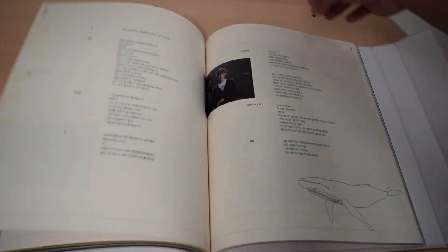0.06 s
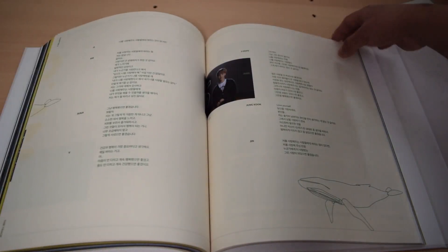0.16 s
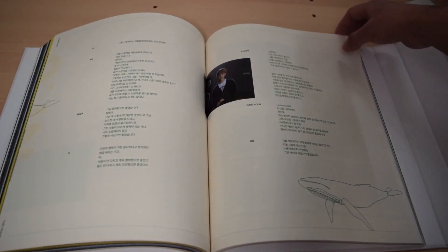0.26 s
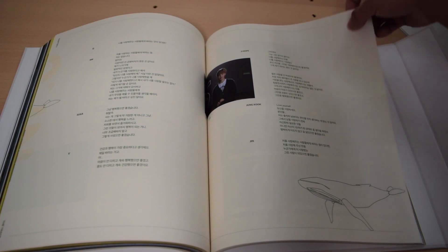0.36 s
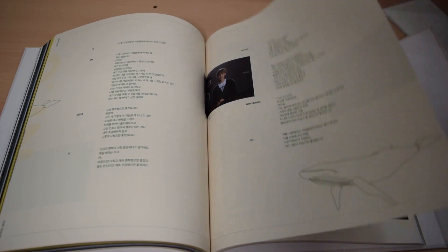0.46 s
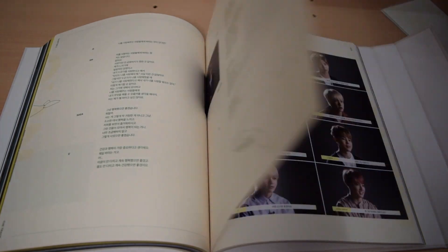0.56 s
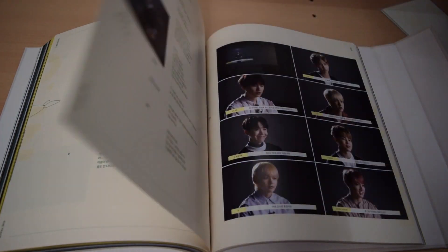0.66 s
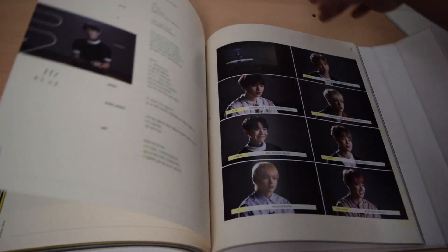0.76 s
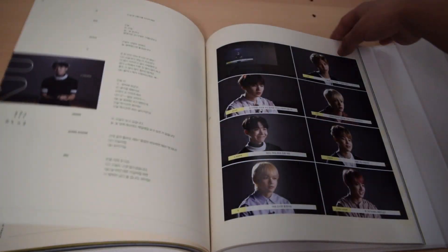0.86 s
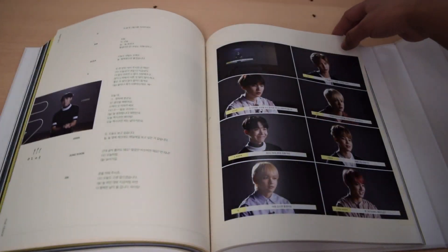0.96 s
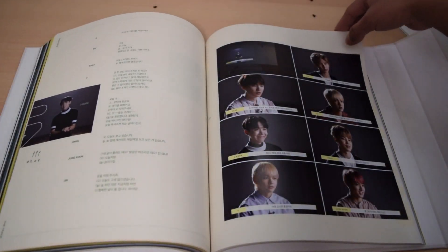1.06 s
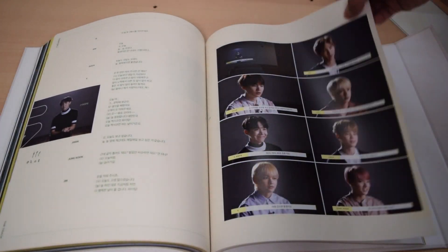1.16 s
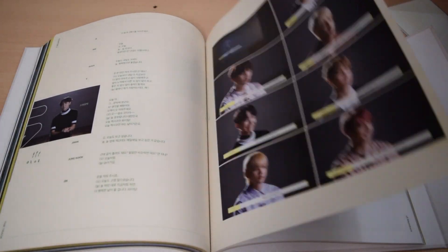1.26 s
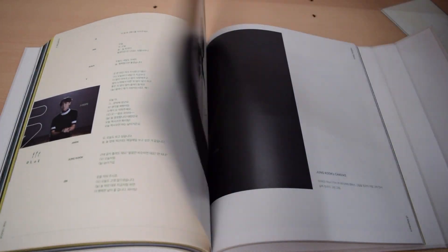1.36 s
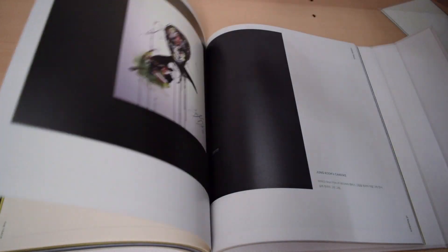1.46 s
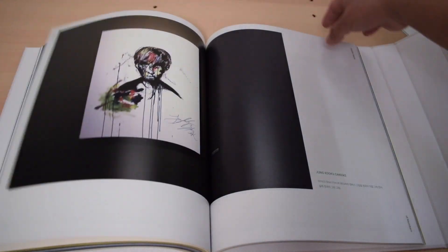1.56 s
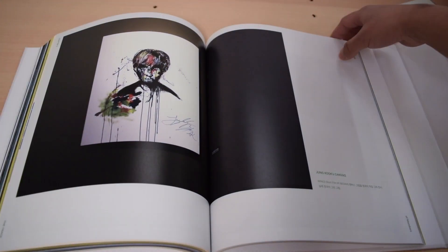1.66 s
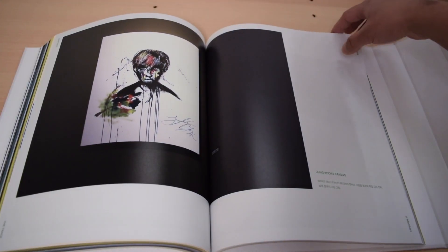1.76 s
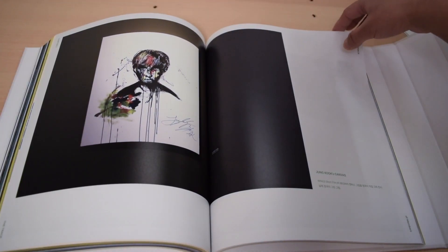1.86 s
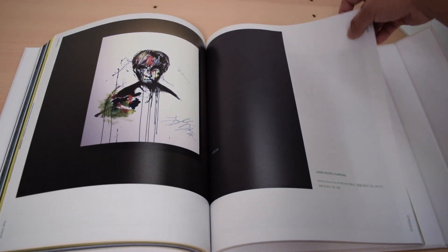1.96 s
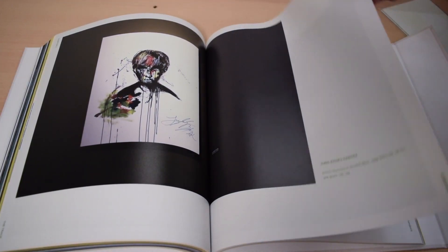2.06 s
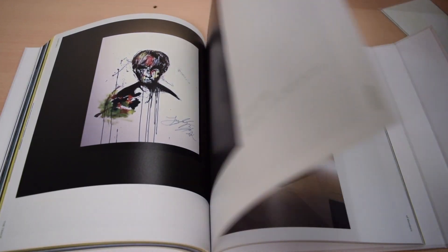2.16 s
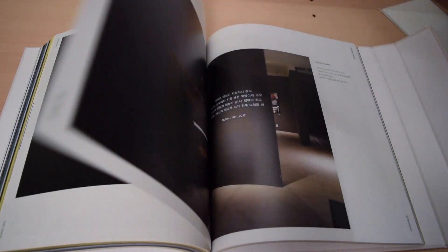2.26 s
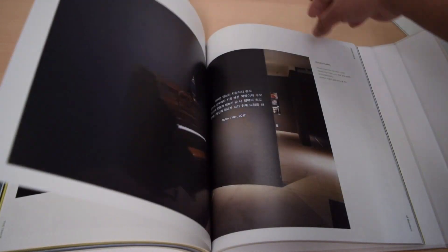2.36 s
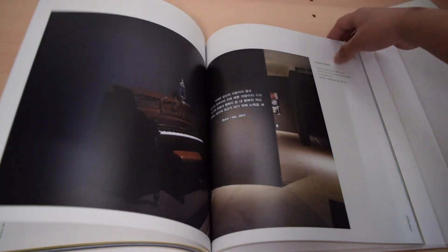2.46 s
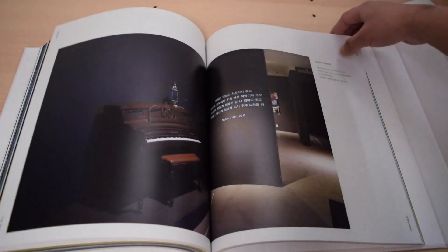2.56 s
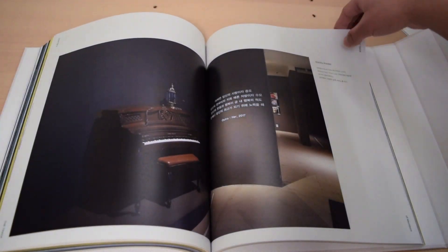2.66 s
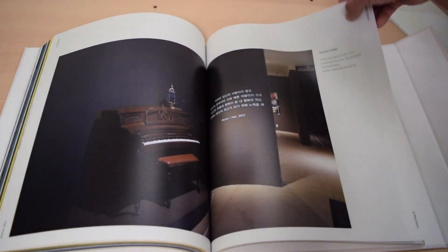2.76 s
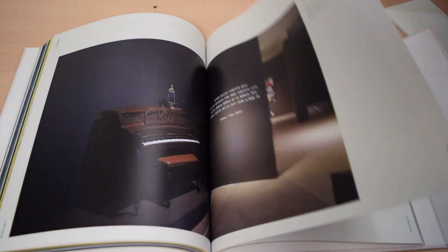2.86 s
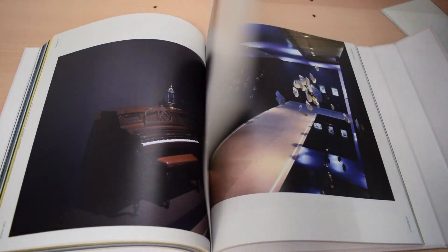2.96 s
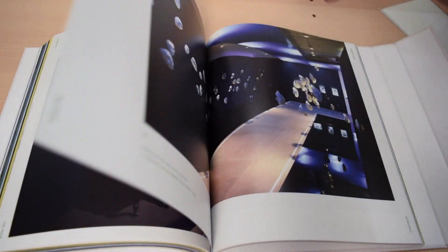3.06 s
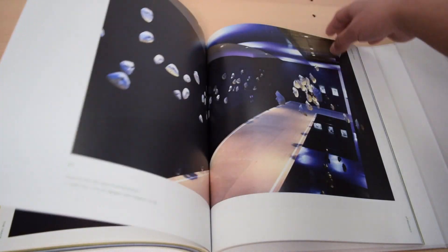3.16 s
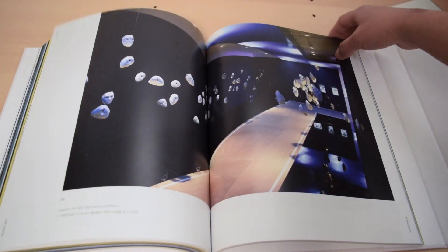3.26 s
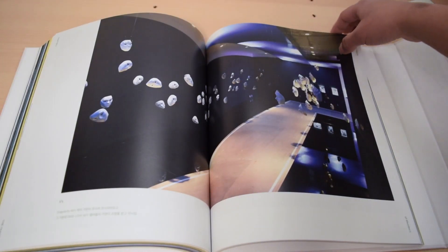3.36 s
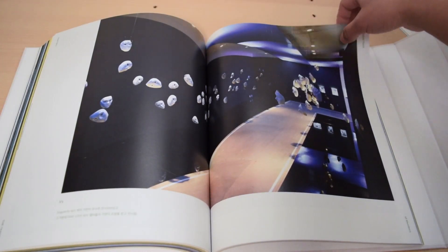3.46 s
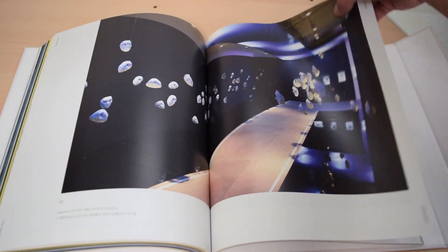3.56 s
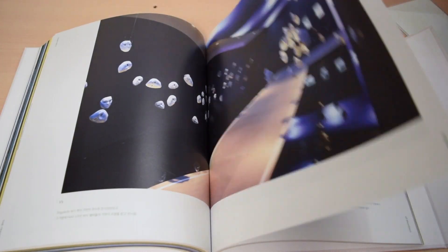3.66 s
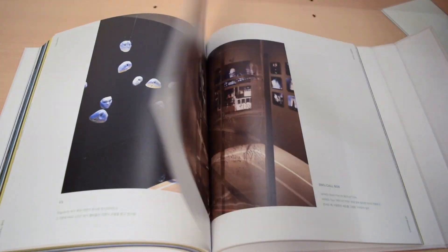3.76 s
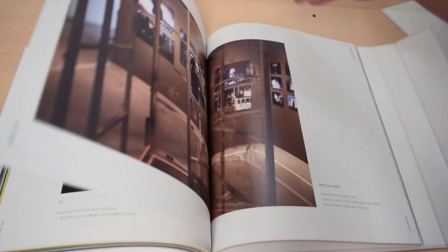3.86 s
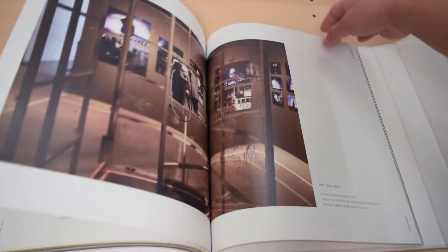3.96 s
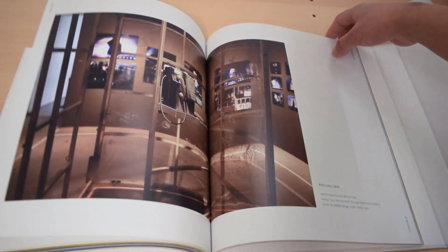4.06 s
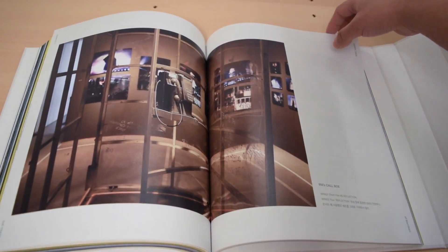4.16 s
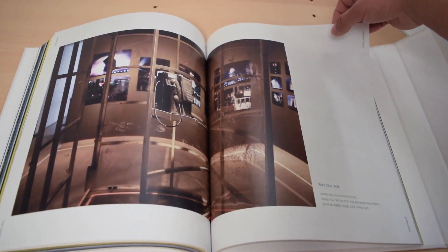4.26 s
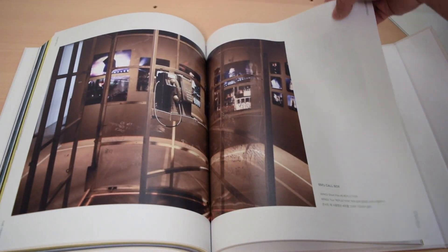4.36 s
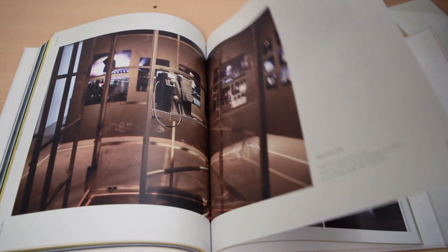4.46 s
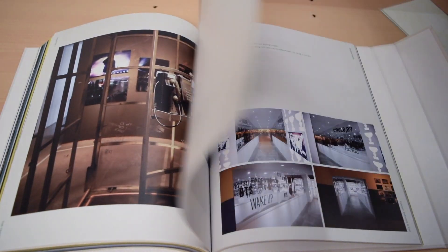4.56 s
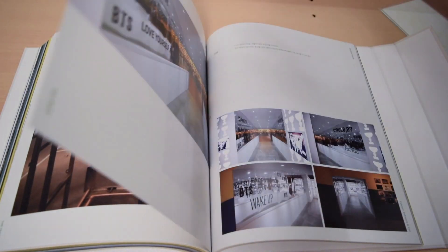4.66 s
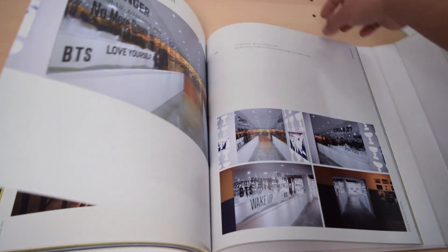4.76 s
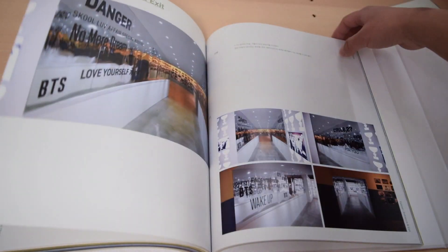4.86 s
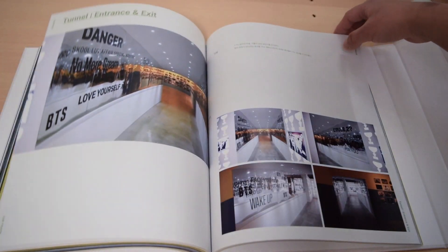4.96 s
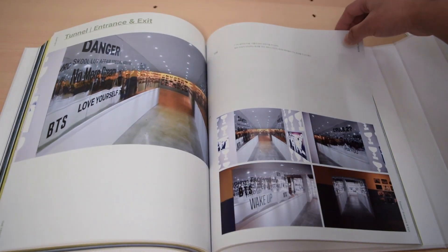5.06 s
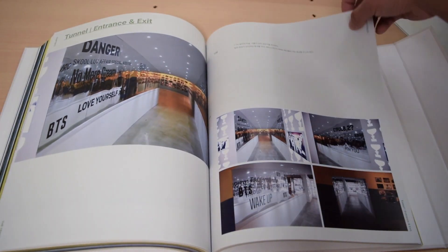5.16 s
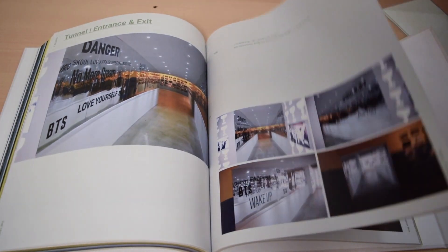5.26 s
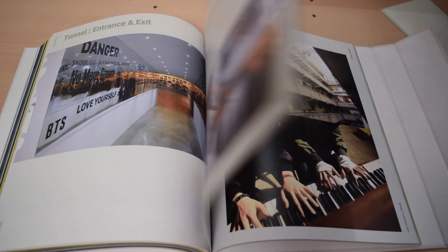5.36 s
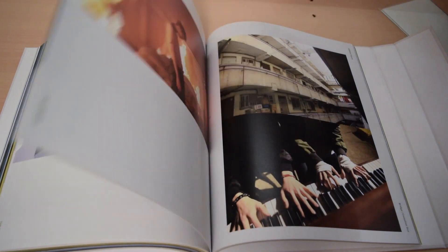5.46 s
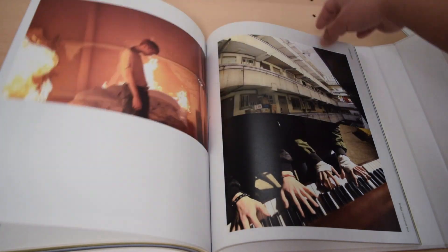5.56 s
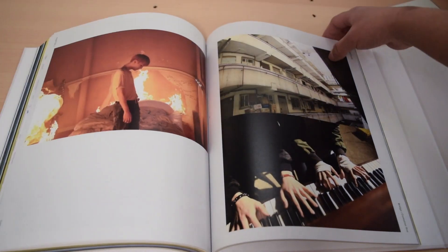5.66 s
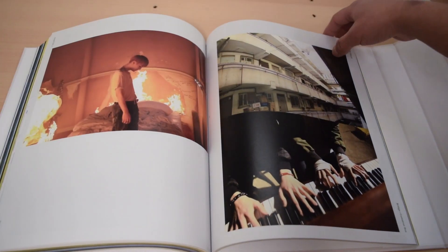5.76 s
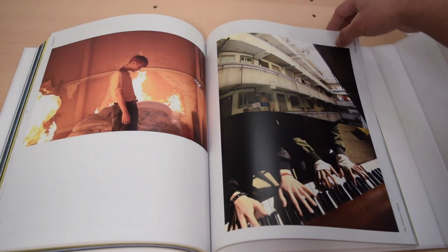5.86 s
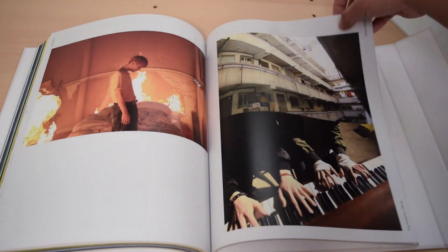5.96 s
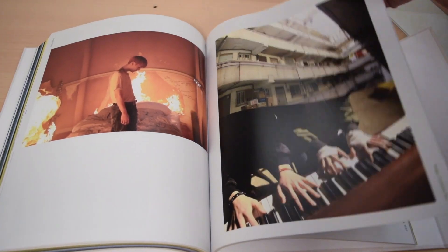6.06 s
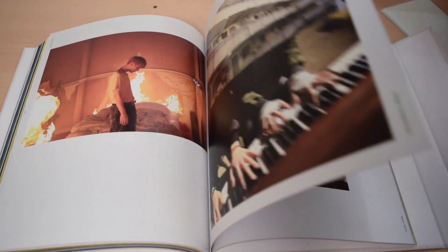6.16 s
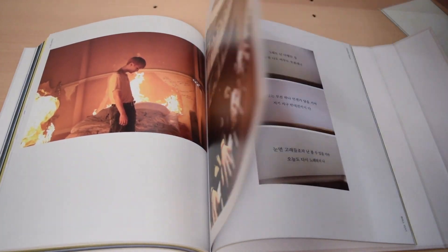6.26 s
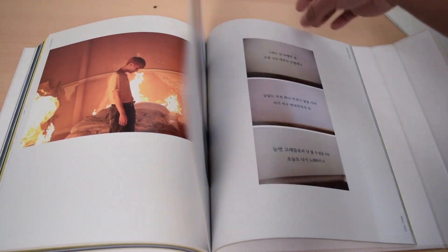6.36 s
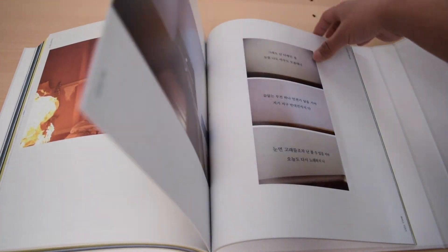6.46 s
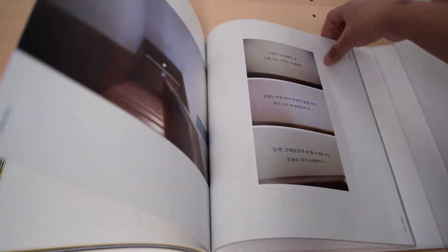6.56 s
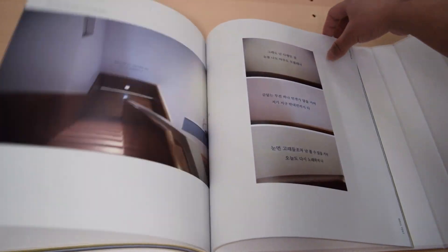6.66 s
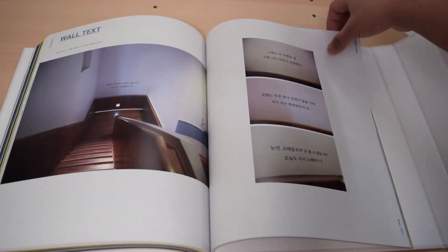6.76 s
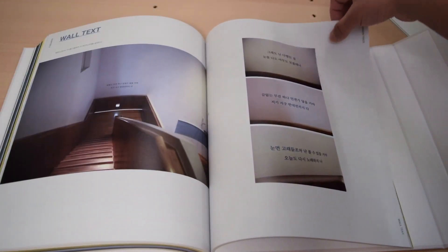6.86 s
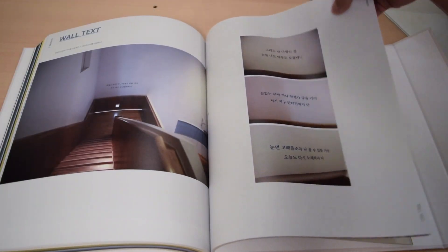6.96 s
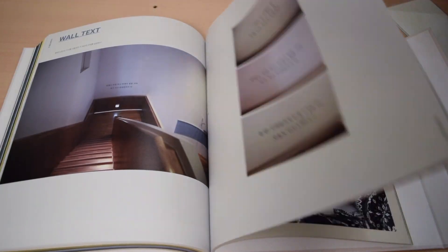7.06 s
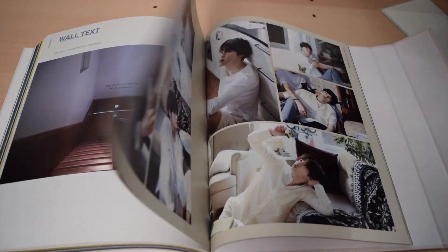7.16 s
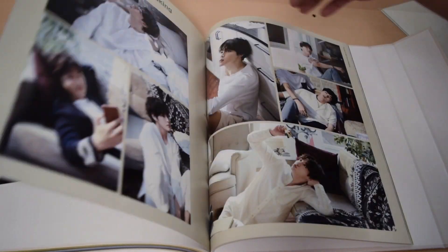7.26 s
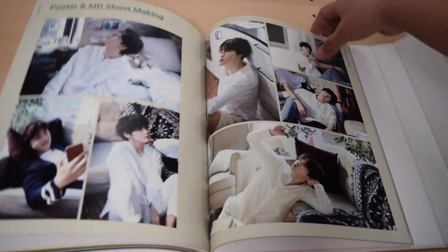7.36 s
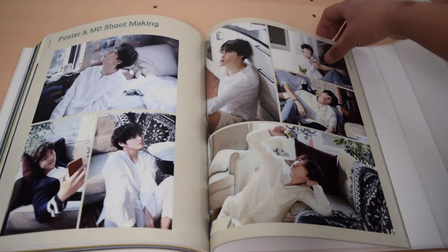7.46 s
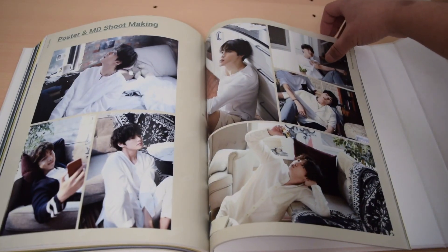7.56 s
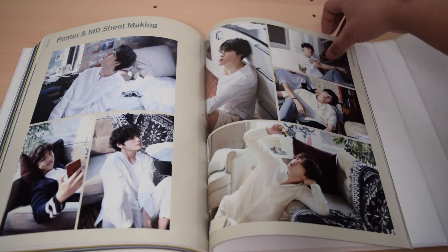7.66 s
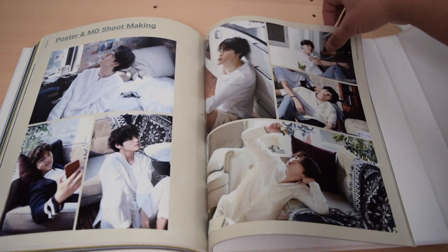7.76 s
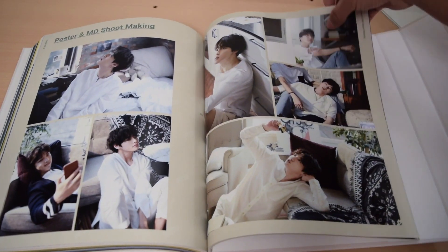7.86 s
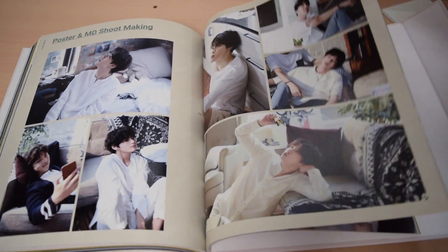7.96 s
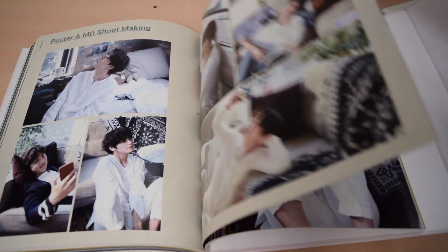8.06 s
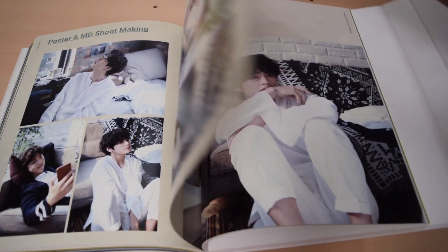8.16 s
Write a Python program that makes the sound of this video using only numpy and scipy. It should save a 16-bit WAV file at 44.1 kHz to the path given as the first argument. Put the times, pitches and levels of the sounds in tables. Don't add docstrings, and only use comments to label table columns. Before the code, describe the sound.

Close-up page turning in a quiet room: skin hisses on coated paper, stiff sheets snap free, buckle over and settle softly on the pile.

```python
import sys
import numpy as np
from scipy import signal
from scipy.fft import rfft, irfft
from scipy.io import wavfile
from scipy.ndimage import uniform_filter1d

SR = 44100
rng = np.random.default_rng(int(sys.argv[2]) if len(sys.argv) > 2 else 0)


def gain_from_decibels(decibels):
    exponent = np.asarray(decibels, float) / 20
    return 10 ** exponent


def to_wav(sig):
    pcm = np.clip(np.atleast_2d(sig), -1, 1) * 32767
    pcm = np.round(pcm).astype(np.int16)
    wavfile.write(sys.argv[1], SR, pcm.T)


N = 362502
FRAME, HOP = 256, 64
BIN_HZ = np.fft.rfftfreq(FRAME, 1 / SR)[:, None]

# frequency in Hz, density in dB per Hz.
FLOOR_SPECTRUM = [(25, -0.5), (260, -0.5), (600, -1.5), (1000, -10.5), (2200, -12), (3000, -21),
                  (6000, -24), (10500, -27), (16000, -30)]
FLOOR_DB = -57.5

# frequency in Hz, T60 in seconds.
ROOM_T60 = [(200, .3), (1000, 0.17), (4000, 0.14), (12000, 0.11)]
ROOM_DB = -11

# peak time, rise and fall in seconds, level in dB.
GUSTS = [
    (3.05, .15, .2, -72),
    (3.4, .15, .2, -71),
    (4.16, .1, .15, -63),
    (5.0, .12, .2, -68),
    (5.5, .2, .25, -62),
    (6.46, .1, 0.14, -57),
    (7.3, .15, 0.29, -62),
]
GUST_HZ, GUST_OCTAVES = 65, 1.2

# peak time in seconds, peak in dB, slap over push in dB, push in Hz.
PATS = [
    (0.9205, -42, -1, 220),
    (1.6694, -39, 0, 230),
    (2.5054, -41, -1, 140),
    (3.2521, -38, -3, 150),
    (4.8737, -36, -1, 200),
    (5.6752, -37.5, 0, 210),
    (6.7948, -33, -10, 250),
]

# frequency in Hz, density in dB per Hz.
RUB_SPECTRUM = [(600, 6), (1800, 13), (3000, 10), (5000, 4.5), (8000, -0.5), (16000, -11)]
# peak time, rise and fall (for 20 dB) in seconds, level and
# brightness in dB.
GRIPS = [(.353, 0.002, 0.03, -49, -8), (.389, 0.022, 0.054, -39.5, -8), (.437, 0.01, 0.15, -44, -12.5),
         (.362, .003, .1, -45, -8), (1.152, .008, .3, -54, -9), (1.187, 0.027, 0.08, -41.5, -12),
         (1.27, 0.12, 0.036, -53, -11.5), (1.965, 0.0038, 0.12, -42, -7.5),
         (2.011, 0.047, 0.085, -40.5, -10.5), (2.06, .05, 0.59, -54.5, -11.5),
         (2.757, 0.0055, 0.093, -45.5, -8), (6.175, 0.036, 0.017, -50, 2), (6.075, .03, 0.04, -56, -2),
         (2.82, 0.013, 0.3, -48.5, -8.5), (2.879, 0.083, 0.037, -48, -11),
         (3.54, 0.0071, 0.051, -43, -10.5), (3.58, 0.0052, 0.18, -46.5, -10), (3.645, .11, 0.087, -45, -11),
         (4.288, .002, 0.031, -46, -10), (4.342, 0.0088, 0.043, -40.5, -11),
         (4.385, 0.019, 0.11, -48.5, -8.5), (4.45, 0.12, 0.38, -52.5, -12.5),
         (5.328, 0.13, 0.038, -50, -10), (6.063, 0.028, 0.57, -54.5, -11),
         (6.148, 0.0099, 0.14, -43, -12.5), (6.914, 0.0056, .33, -54, -10.5),
         (6.996, 0.022, 0.044, -39.5, -8.5), (7.04, .033, 0.24, -52.5, -11), (7.932, 0.052, 0.2, -46.5, -8)]
SLIDES = [(.622, 0.027, 0.073, -35.5, -6.5), (1.392, 0.035, 0.061, -42.5, -9), (2.19, 0.081, .03, -43, -7),
          (2.233, 0.018, 0.036, -32.5, -6.5), (2.993, 0.055, 0.04, -50, -15),
          (3.73, 0.0067, .04, -39.5, -4.5), (3.785, 0.0099, 0.06, -36.5, -10), (4.558, .02, 0.038, -35, -6),
          (4.64, 0.061, 0.067, -43.5, -15), (5.372, 0.024, .04, -47.5, -9),
          (5.418, 0.022, 0.061, -42, -13.5), (6.256, 0.037, 0.04, -44, -7.5),
          (7.106, .005, 0.13, -40.5, -9.5), (8.098, .004, 0.15, -38.5, -4),
          (8.151, 0.0063, 0.033, -37, -21), (2.308, .002, 0.05, -44, -16), (2.338, .002, 0.054, -45, -23),
          (7.27, .01, 0.047, -55, -23), (7.345, .03, 0.067, -51.5, -27), (8.175, 0.023, 0.067, -31.5, 1)]
# peak time in seconds, level in dB.
TOUCHES = [(1.04, -64), (1.796, -57), (3.436, -55.5), (4.208, -57), (5.69, -56.5), (5.8, -57.5),
           (5.98, -57), (6.565, -52.5), (6.693, -53), (6.813, -55.5), (7.436, -61), (7.481, -50.5),
           (7.633, -52.5)]
TOUCH_RISE_S, TOUCH_FALL_S, TOUCH_BRIGHT_DB = 0.034, 0.093, -8
# start and length in seconds, level and brightness in dB.
RUNS = [(0.553, 0.07, -43, -4), (1.329, 0.056, -49.5, -3.5), (2.196, 0.014, -41, -3),
        (2.937, 0.049, -51, -3), (3.729, 0.039, -43, -5), (4.543, 0.092, -48.5, -5.5),
        (5.191, 0.022, -52.5, -9.5), (5.236, .028, -50.5, -5.5), (5.368, 0.039, -47, -3),
        (7.122, 0.062, -47.5, -3), (8.047, 0.12, -48.5, -5)]
RUN_RISE_S, RUN_FALL_S = 0.0064, 0.044
RUB_REST_DB, REST_BRIGHT_DB = -64.5, -9
DULLING_DB = -2
RISE_CURVE, FALL_CURVE = 1, 0.84

# start and length in seconds, level in
# dB, pitch in Hz.
FOLDS = [(0.631, 0.16, -45, 563), (3.062, 0.064, -40, 426), (3.116, 0.067, -38, 840),
         (4.622, 0.092, -44.5, 1230), (6.307, 0.056, -43.5, 417), (6.38, 0.087, -46.5, 442),
         (6.454, 0.07, -44.5, 430), (6.817, 0.033, -43, 1616), (7.107, 0.062, -33.5, 546),
         (5.467, 0.039, -43.5, 463), (5.514, .04, -45, 545), (7.272, 0.049, -43.5, 423),
         (4.342, 0.016, -40.5, 683), (1.779, .008, -60, 10200), (1.796, .012, -52, 11800),
         (1.849, .025, -57, 9300)]
FOLD_WIDTH_HZ, FOLD_FADE_DB = 150, -14
FOLD_GLIDE = 0.05

# peak time, rise and fall in seconds, level in dB, centre in Hz.
BENDS = [(.383, 0.026, 0.37, -45, 1490), (1.191, 0.006, 0.048, -36, 1030),
         (1.981, 0.0098, 0.069, -37.5, 1300), (2.161, 0.032, 0.085, -48, 1500),
         (2.856, 0.01, 0.027, -35.5, 1060), (3.544, 0.009, 0.019, -45, 1380),
         (3.598, 0.032, 0.19, -46, 1060), (4.3, 0.012, 0.031, -46, 850), (4.34, 0.014, 0.042, -55, 1350),
         (4.74, 0.0088, 0.051, -35.5, 970), (4.765, .02, 0.042, -40, 980), (5.238, 0.032, 0.22, -48, 1070),
         (5.681, 0.011, 0.15, -48, 750), (6.064, 0.0071, 0.04, -35.5, 1360),
         (6.565, 0.012, 0.089, -47, 806), (6.681, 0.07, 0.075, -44, 1280), (6.795, .016, .4, -64, 480),
         (6.998, 0.21, 0.1, -48, 1250), (7.495, 0.18, 0.15, -47, 1050), (7.633, 0.058, 0.93, -52.5, 1170),
         (7.932, 0.041, 0.24, -44.5, 1230), (8.076, 0.26, 0.14, -62, 1060)]
WOBBLES = [(.004, 0.046, 0.052, -34, 1030), (.624, 0.018, 0.02, -22.5, 1050),
           (.645, 0.028, 0.089, -33.5, 900), (1.405, 0.026, 0.072, -22, 760),
           (1.445, 0.012, 0.05, -19.5, 1040), (1.47, 0.046, 0.015, -23, 1160),
           (1.49, .02, 0.07, -31.5, 1130), (2.227, 0.0034, 0.092, -22, 1200),
           (2.307, 0.002, 0.03, -21.5, 1290), (2.317, .02, 0.038, -25.5, 1360),
           (2.343, 0.005, 0.06, -24, 1690), (2.39, .03, 0.097, -40, 1800), (2.987, 0.0046, 0.039, -26, 900),
           (3.065, 0.0067, 0.11, -35, 710), (3.048, 0.017, 0.026, -41, 493),
           (3.092, 0.041, 0.083, -36, 500), (3.15, 0.034, 0.062, -31, 1210),
           (3.12, 0.016, 0.067, -25.5, 1030), (3.73, 0.0079, 0.021, -32, 1530),
           (3.8, 0.0076, 0.087, -25.5, 1080), (3.85, 0.045, 0.077, -27, 1240), (3.92, .03, 0.05, -41, 1250),
           (4.556, 0.0065, 0.07, -33, 960), (4.61, 0.034, 0.032, -32, 900),
           (5.525, 0.0091, 0.066, -36.5, 725), (5.466, 0.011, 0.073, -32.5, 750),
           (5.482, 0.0089, 0.033, -30.5, 1610), (6.198, 0.011, 0.036, -21, 1110),
           (6.315, 0.0075, 0.22, -41, 454), (6.36, 0.033, .03, -37, 430), (6.475, 0.044, 0.096, -40.5, 432),
           (7.118, 0.02, 0.0078, -29, 710), (7.19, 0.024, 0.039, -28, 1270),
           (7.273, 0.023, 0.1, -29.5, 760), (7.351, 0.1, 0.056, -29, 920), (8.135, 0.1, 0.038, -37.5, 990),
           (8.148, 0.0061, 0.03, -17, 900), (8.157, 0.011, 0.073, -16.5, 1230)]
FLEX_REST_DB, FLEX_REST_HZ = -63.5, 900
SAG_OCTAVES = -0.023
SHEET_TOP_HZ = 1950

# peak time in seconds, peak in dB, ring in Hz.
CORNER_POPS = [(.2284, -42, 750), (.4541, -35, 1000), (1.1904, -30, 1660), (1.9633, -43, 2200),
               (2.1711, -31, 1210), (2.8528, -24, 1300), (3.6608, -35, 2090), (4.2917, -29, 800),
               (4.3775, -32, 1610), (4.4245, -34, 780), (6.0662, -39, 1570), (6.1567, -30, 1850),
               (6.559, -46, 410), (6.8215, -32, 1700), (7.0311, -28, 730), (7.7409, -40, 820),
               (8.0446, -33, 1490)]
SHEET_POPS = [(1.444, -23, 1200), (2.2268, -13, 1250), (2.3068, -30, 1700), (2.3366, -14.5, 1900),
              (2.99, -29, 990), (3.0634, -32, 990), (3.1211, -27, 900), (3.7296, -32, 1610),
              (3.7998, -27, 1270), (4.5588, -24, 1830), (4.6377, -29, 1250), (5.4147, -32, 1600),
              (5.462, -36, 900), (5.4676, -33, 1980), (5.526, -37, 800), (6.1968, -20, 990),
              (6.2071, -26, 600), (7.1051, -28, 600), (7.1159, -23, 580), (7.1225, -24, 900),
              (7.1846, -29, 900), (7.2767, -31, 1530), (7.3473, -28, 1250), (8.1479, -18, 800),
              (8.1524, -14, 1200), (8.1649, -12, 1300), (8.1695, -25, 600), (1.4615, -22, 1300)]
CORNER_T60_S, SHEET_T60_S = 0.009, 0.014

# peak time in seconds, peak in dB, frequency in Hz.
CRACKS = [(.3522, -39, 2200), (.4012, -33, 2200), (.4253, -29, 1800), (.4339, -29, 2600),
          (.4541, -36, 1300), (.4595, -37, 900), (2.2292, -22, 2300), (2.2312, -21, 2000),
          (5.4148, -33, 2300), (6.558, -42, 900), (6.592, -42, 1600), (7.1845, -36, 1700),
          (2.7955, -35, 1500), (2.8177, -33, 2400), (2.8528, -31, 1800), (3.0634, -35, 1100),
          (4.2917, -30, 1700), (4.3775, -42, 1600), (4.3855, -35, 1300), (4.4245, -33, 900),
          (5.4755, -32, 600), (5.5235, -35, 620), (8.0965, -22, 1200)]
CRACK_CYCLES, CRACK_EDGE_DB = 0.55, -7

# peak time in seconds, peak in dB, centre in Hz, top octave in dB,
# length in seconds.
SNAPS = [(.3858, -28, 4390, -14, .008), (.6062, -15, 3800, -20, .007), (.6060, -11, 7500, -6, .007),
         (1.3922, -15, 3100, -34, .006), (2.0106, -25, 4720, -12, .009), (2.2328, -19, 2520, -10, .007),
         (3.7272, -27, 3000, -14, .005), (3.7867, -23, 4570, -9, .008), (4.5578, -21, 2820, -5, .007),
         (4.6337, -31, 3530, -13, .008), (5.4148, -29, 2970, -12, .007), (6.2424, -20, 2610, 0, .0028),
         (7.115, -21, 2900, -11, .008), (7.9297, -22, 7450, 2, .0028), (8.0445, -18, 4690, 5, .005),
         (8.0885, -23, 7000, 4, .0028), (8.097, -16, 4390, 3, .004), (8.1341, -25, 4000, -10, .008),
         (8.1643, -1, 2900, -2, .002), (8.1658, -16, 2900, 5, .003), (8.181, -24, 9000, 0, .006)]
# peak time in seconds, peak in dB, centre in Hz, top octave in dB.
TICKS = [(.353, -37, 5000, -12), (.3607, -32, 5510, -9), (.4256, -34, 4500, 2), (.4339, -35, 5000, 0),
         (1.1902, -33, 2520, -7), (1.8640, -43, 9500, -2), (2.1681, -28, 2520, -13),
         (2.796, -40, 2600, -14), (2.8177, -33, 4200, -8), (2.873, -36, 4500, -10),
         (3.2538, -41, 2950, -15), (3.4454, -40, 2840, -10), (3.593, -36, 2520, -9),
         (4.2917, -28, 4200, -10), (4.3777, -34, 3100, -9), (4.4244, -37, 2520, -12),
         (5.2363, -33, 2630, 0), (6.048, -38, 2500, -6), (7.196, -38, 9000, 0), (6.9955, -32, 1500, -14),
         (5.888, -45, 7000, -2), (5.9382, -39, 4670, -1), (6.1566, -34, 3320, -11), (6.876, -45, 5000, -8),
         (6.9143, -41, 5680, -15), (7.0309, -31, 2300, -5), (7.1044, -30, 2820, -10),
         (7.6334, -41, 2560, -4), (7.679, -46, 7900, 0), (7.7127, -38, 2520, -5), (7.749, -46, 7900, 0),
         (8.028, -41, 10000, 0), (8.033, -40, 11000, 0), (8.038, -40, 4500, -12), (1.979, -33, 3500, -10),
         (2.1975, -34, 7000, -4), (3.576, -39, 2500, -12), (4.385, -37, 2500, -14),
         (5.3705, -36, 4800, -12)]
TICK_S = 0.003
RUSTLE_DB, RUSTLE_DB_PER_MS = -33, 1.0

MIC_LOW_HZ, MIC_TOP_HZ = 70, 15700


def evened(x):
    return x / np.sqrt(np.mean(x ** 2) + 1e-20)


def peaked(x):
    return x / abs(x).max()


def read(points, hz):
    f, value = np.transpose(points)
    return np.interp(np.log(hz + 1), np.log(f + 1), value)


def band(x, hz, octaves):
    edges = np.clip(hz * 2. ** np.array([-octaves / 2, octaves / 2]), 30, 21000)
    return signal.sosfilt(signal.butter(N=1, Wn=edges, btype="band", fs=SR, output="sos"), x)


def steep_band(x, hz, octaves):
    return band(band(x, hz, octaves), hz, octaves)


def add(mix, s, sound):
    part = mix[round(s * SR):][:len(sound)]
    part += sound[:len(part)]


def add_peak(mix, s, db, sound):
    top = abs(sound).argmax()
    add(mix, s - top / SR, gain_from_decibels(db) * -sound / sound[top])


def smooth_field(shape, frames, bins):
    field = uniform_filter1d(rng.standard_normal(shape[::-1]), size=frames, axis=0)
    return evened(uniform_filter1d(field, size=bins, axis=1).T)


def lumps(samples):
    size = max(int(samples), 2)
    return evened(uniform_filter1d(uniform_filter1d(rng.standard_normal(N), size), size))


def coloured(x, shape_db, patchy_db):
    z = signal.stft(x, nperseg=FRAME, noverlap=FRAME - HOP)[2]
    gain = gain_from_decibels(shape_db + patchy_db * smooth_field(z.shape, frames=24, bins=4))
    gain /= np.sqrt(np.mean(gain_from_decibels(shape_db) ** 2, axis=0))
    return signal.istft(z * gain, nperseg=FRAME, noverlap=FRAME - HOP)[1][:N]


def modal(depth_db, bins, frames):
    z = signal.stft(rng.standard_normal(N), nperseg=2048, noverlap=1536)[2]
    gain = gain_from_decibels(depth_db * smooth_field(z.shape, frames, bins))
    return evened(signal.istft(z * gain, nperseg=2048, noverlap=1536)[1][:N])


def strokes(rows, rest_db, rest_colour, drift):
    s, hold, rise, fall, db, colour = np.transpose(rows)[:, :, None]
    frame_s = np.arange(-(-N // HOP) + 1) * HOP / SR
    before = np.maximum(s - frame_s, 0) / np.maximum(rise, .002)
    after = np.maximum(frame_s - s - hold, 0) / np.maximum(fall, .005)
    stroke_db = db - 20 * before ** RISE_CURVE - 20 * after ** FALL_CURVE
    power = gain_from_decibels(np.maximum(stroke_db, -150)) ** 2
    rest_power = gain_from_decibels(rest_db) ** 2
    total = power.sum(0) + rest_power
    blend = ((power * (colour + drift * after)).sum(0) + rest_power * rest_colour) / total
    return np.interp(np.arange(N) / SR, frame_s, 10 * np.log10(total)), blend


def floor():
    hz = np.fft.rfftfreq(N, 1 / SR)
    hiss = irfft(rfft(rng.standard_normal(N)) * gain_from_decibels(read(FLOOR_SPECTRUM, hz)), N)
    return gain_from_decibels(FLOOR_DB + 1.1 * lumps(4000)) * evened(hiss)


def room(x):
    taps = np.zeros(SR // 2)
    at = np.arange(220, len(taps) - 20, 12)
    taps[at + rng.integers(0, 12, len(at))] = rng.choice([-1., 1.], len(at))
    hz, t, z = signal.stft(taps, SR, nperseg=FRAME)
    decay = gain_from_decibels(-60 * t / read(ROOM_T60, hz)[:, None])
    tail = signal.istft(z * decay, SR, nperseg=FRAME)[1]
    return signal.fftconvolve(x, tail / np.linalg.norm(tail))[:N]


def gusts():
    rows = [(s, 0, rise, fall, db, 0) for s, rise, fall, db in GUSTS]
    level_db, _ = strokes(rows, -120, 0, 0)
    return gain_from_decibels(level_db) * evened(steep_band(rng.standard_normal(N), GUST_HZ, GUST_OCTAVES))


def pats():
    out, t = np.zeros(N), np.arange(3000) / SR
    for (s, db, slap_db, hz), noise in zip(PATS, rng.standard_normal((len(PATS), 3000))):
        push = np.sin(2 * np.pi * hz * t) * np.exp(-(t * hz / .75) ** 2)
        push += .25 * np.sin(2 * np.pi * .6 * hz * t) * np.exp(-t / .005)
        push = push + 0.35 * np.roll(push, round(0.0069 * SR))
        puff = band(noise * np.exp(-t / 0.0078), 680, 0.86)
        add_peak(out, s, db + 3, peaked(push) + gain_from_decibels(slap_db) * peaked(puff))
    return out


def rub():
    touches = [(s, 0, TOUCH_RISE_S, TOUCH_FALL_S, db, TOUCH_BRIGHT_DB) for s, db in TOUCHES]
    runs = [(s, hold, RUN_RISE_S, RUN_FALL_S, db, bright) for s, hold, db, bright in RUNS]
    peaks = [(s, 0, *rest) for s, *rest in list(GRIPS) + list(SLIDES)]
    level_db, bright_db = strokes(peaks + runs + touches, RUB_REST_DB, REST_BRIGHT_DB, DULLING_DB)
    slip_size = gain_from_decibels(2 * np.minimum(rng.exponential(1, N), 3.5))
    slips = slip_size * (rng.random(N) < 2000 / SR)
    grit = 1 + uniform_filter1d(slips, size=6) * 2
    drive = modal(1.8, bins=14, frames=8) * grit * gain_from_decibels(1.9 * lumps(130))
    tilt_octaves = np.log2(np.clip(BIN_HZ, 2500, 16000) / 6000)
    shape_db = read(RUB_SPECTRUM, BIN_HZ) + 0.97 * (bright_db + 11.0) * tilt_octaves
    return gain_from_decibels(level_db + 1.5) * coloured(evened(drive), shape_db, patchy_db=1.5)


def folds():
    out = np.zeros(N)
    lowpass = signal.butter(N=2, Wn=FOLD_WIDTH_HZ / 2, fs=SR, output="sos")
    for (s, length, db, hz), noise in zip(FOLDS, rng.standard_normal((len(FOLDS), SR // 2))):
        u = np.arange(round(length * SR)) / (length * SR)
        turn = np.exp(2j * np.pi * np.cumsum(hz * (1 + FOLD_GLIDE * u)) / SR)
        slow = signal.sosfilt(lowpass, np.tile(noise.reshape(2, -1), 2))
        mode = evened(((slow[0] + 1j * slow[1])[-len(u):] * turn).real)
        fade = np.minimum(1, np.minimum(u * length / .004, (1 - u) / .15))
        add(out, s, gain_from_decibels(db + FOLD_FADE_DB * u) * fade * mode)
    return out


def flex():
    rows = [(s, 0, rise, fall, db, np.log2(hz)) for s, rise, fall, db, hz in list(BENDS) + list(WOBBLES)]
    level_db, octave = strokes(rows, FLEX_REST_DB, np.log2(FLEX_REST_HZ), SAG_OCTAVES)
    hz = 2 ** octave
    drive = modal(3.6, bins=3, frames=5) * gain_from_decibels(1.5 * lumps(80))
    slope = np.where(BIN_HZ > hz, 6.5, 4.2)
    narrowing = (1100 / hz) ** 0.066
    crowd_db = -slope * np.log2((BIN_HZ + 40) / hz) ** 2 * narrowing
    top_hz = SHEET_TOP_HZ * (hz / 1200) ** 0.31
    stiff_db = -55 * np.maximum(np.log2((BIN_HZ + 40) / top_hz), 0)
    shape_db = np.maximum(crowd_db + stiff_db, -70)
    return gain_from_decibels(level_db - 7.5) * coloured(evened(drive), shape_db, patchy_db=1.6)


def buckles():
    out, t = np.zeros(N), np.arange(4000) / SR
    rows = [(*row, CORNER_T60_S) for row in CORNER_POPS] + [(*row, SHEET_T60_S) for row in SHEET_POPS]
    for (s, db, hz, t60_s), chance in zip(rows, rng.random((len(rows), 3))):
        ratios = np.array([.6, 1, 1.35]) * (.92 + 0.22 * chance)
        ring = np.sin(2 * np.pi * hz * ratios[:, None] * t) * gain_from_decibels([[-4], [0], [-6]])
        kick = 1 - np.exp(-(t * hz / 1.1) ** 2)
        add_peak(out, s, db - 3, ring.sum(0) * gain_from_decibels(-60 * t / t60_s) * kick)
    return out


def cracks():
    out, t = np.zeros(N), np.arange(400) / SR
    for s, db, hz in CRACKS:
        jump = np.sin(2 * np.pi * hz * t) * np.exp(-t * hz / CRACK_CYCLES / 2)
        edge = np.cos(2 * np.pi * 5 * hz * t) * np.exp(-t * hz * 4)
        add_peak(out, s, db, jump + gain_from_decibels(CRACK_EDGE_DB) * edge)
    return out


def snaps():
    out, t = np.zeros(N), np.arange(4000) / SR
    rows = list(SNAPS) + [(*row, TICK_S) for row in TICKS]
    for (s, db, hz, top_db, length), noise in zip(rows, rng.standard_normal((len(rows), 4000))):
        phase = t / length
        burst = noise * phase ** (length / 0.004) * np.exp(-6.0 * phase)
        core = evened(steep_band(burst, hz, .7))
        wide = evened(steep_band(burst, 1.4 * hz, 2.4))
        top_hz = 9000 * 2 ** ((top_db + 15) / 70)
        top = steep_band(burst, top_hz, 1.3)
        crack = peaked(core + gain_from_decibels(-4 + top_db / 2) * wide) + gain_from_decibels(top_db - 5.5) * peaked(top)
        rustle = evened(steep_band(noise[::-1], hz, .6)) * np.exp(-t / .03) * (1 - np.exp(-t / .004))
        rustle_db = RUSTLE_DB + RUSTLE_DB_PER_MS * length / 1e-3
        rustle_gain = gain_from_decibels(rustle_db) * np.sqrt(length / .006) * min(1, 4000 / hz)
        add_peak(out, s, db - 2, peaked(crack) + rustle_gain * rustle)
    return out


def scene():
    hits = steep_band(snaps() + buckles() + cracks(), 2500, 7.3) + pats()
    sheet = band(rub() + flex() + folds(), 1470, 17.1)
    tail = gain_from_decibels(ROOM_DB) * room(hits + gain_from_decibels(-9) * sheet)
    return (hits + sheet + tail + floor() + gusts())[None]


def band_limit(x):
    return signal.sosfilt(signal.butter(12, 17150, fs=SR, output="sos"), x)


def record(dry):
    high_pass = signal.butter(N=2, Wn=MIC_LOW_HZ, btype="high", fs=SR, output="sos")
    low_cut = signal.sosfilt(high_pass, dry)
    low_pass = signal.firwin(numtaps=127, cutoff=MIC_TOP_HZ, fs=SR)
    top_cut = signal.oaconvolve(low_cut, low_pass[None], "same")
    return band_limit(top_cut)


dry = scene()
out = record(dry)
to_wav(out)
```